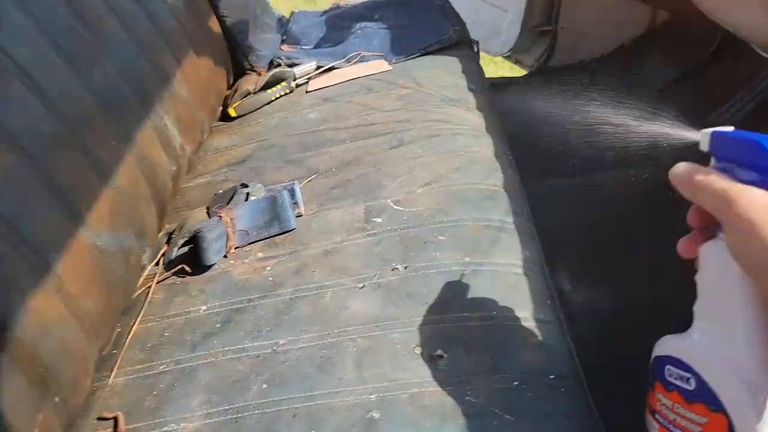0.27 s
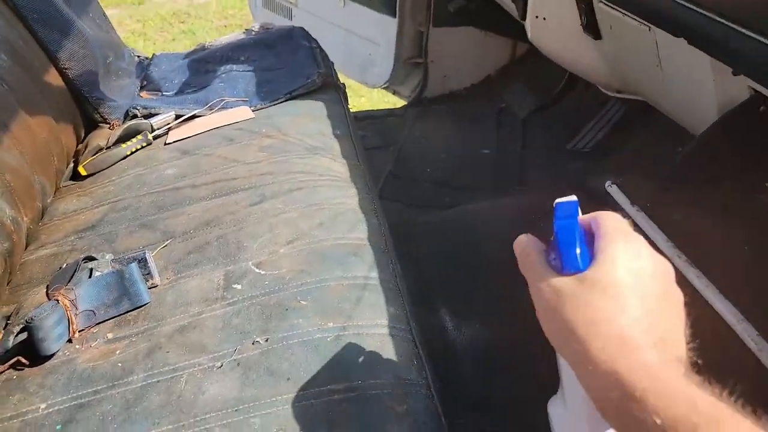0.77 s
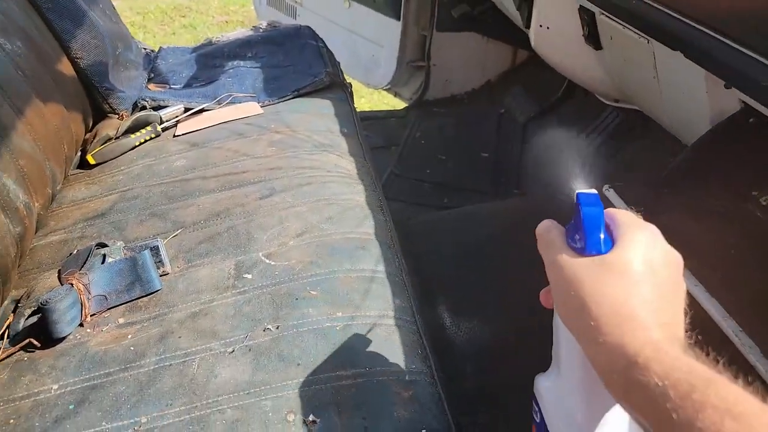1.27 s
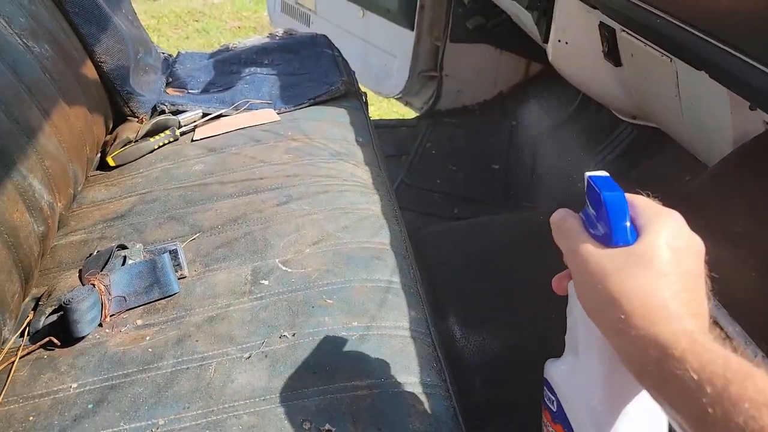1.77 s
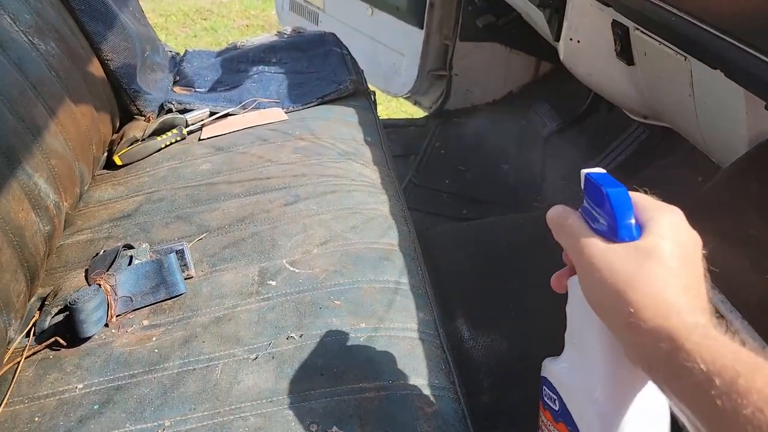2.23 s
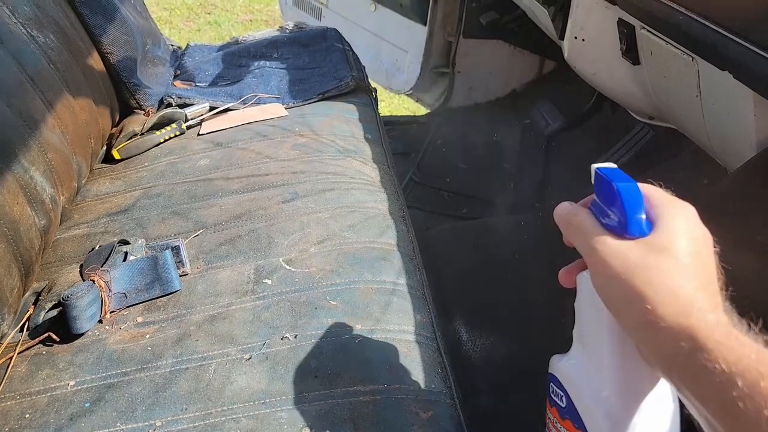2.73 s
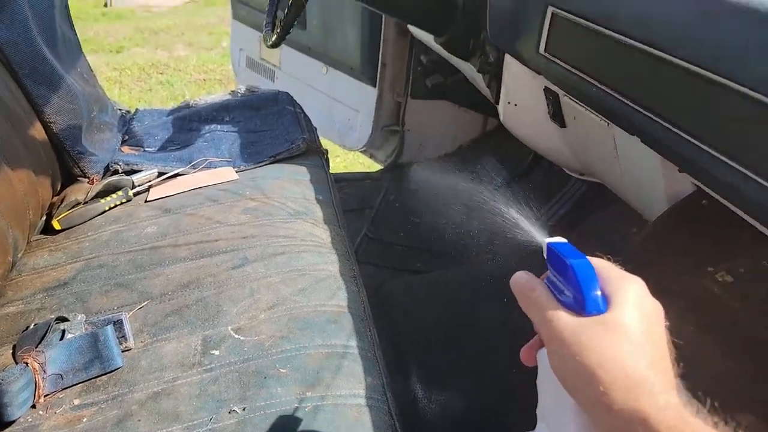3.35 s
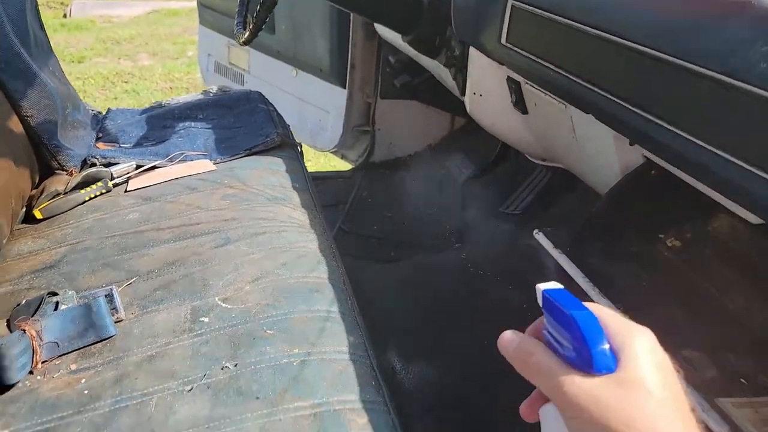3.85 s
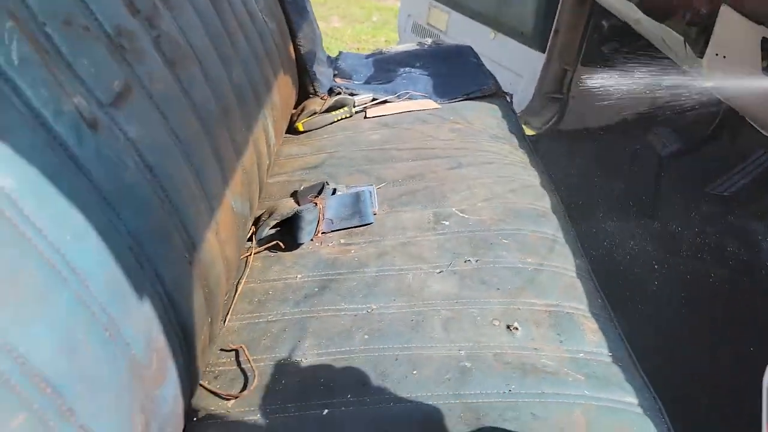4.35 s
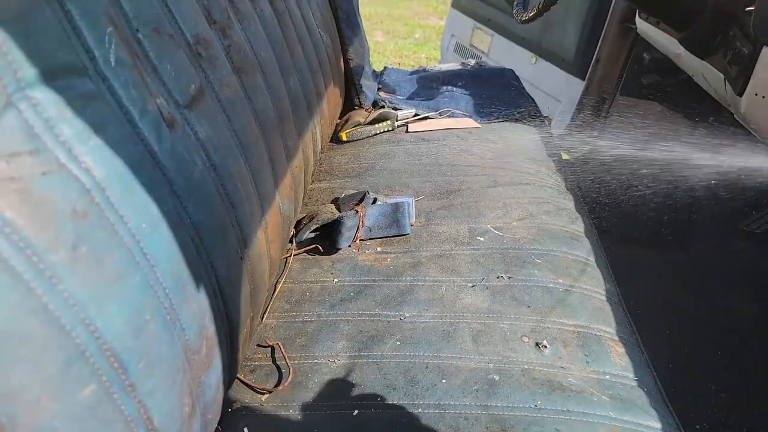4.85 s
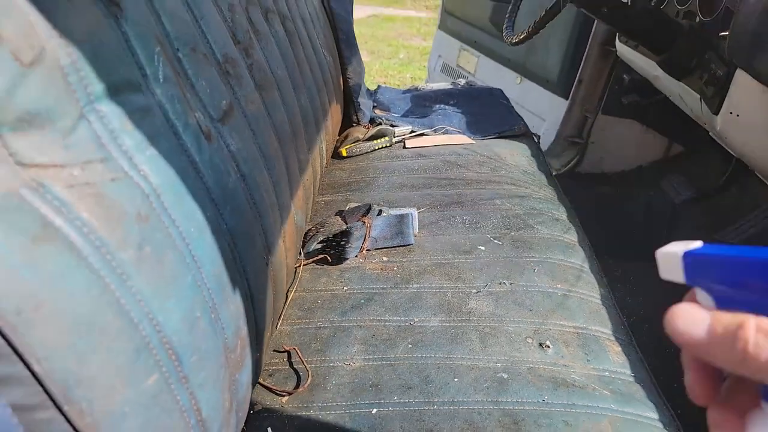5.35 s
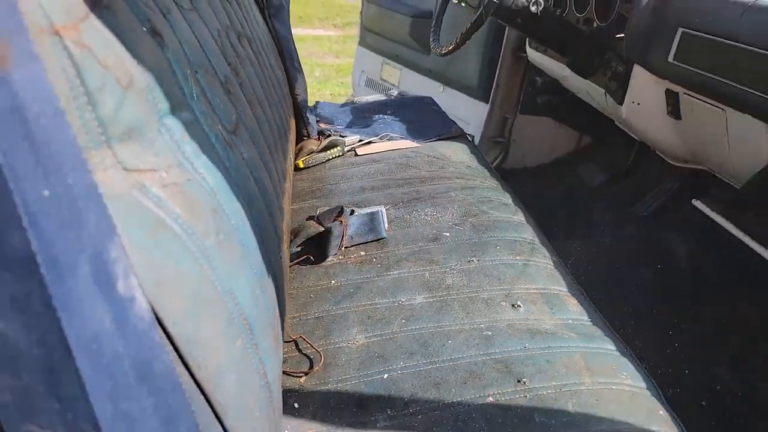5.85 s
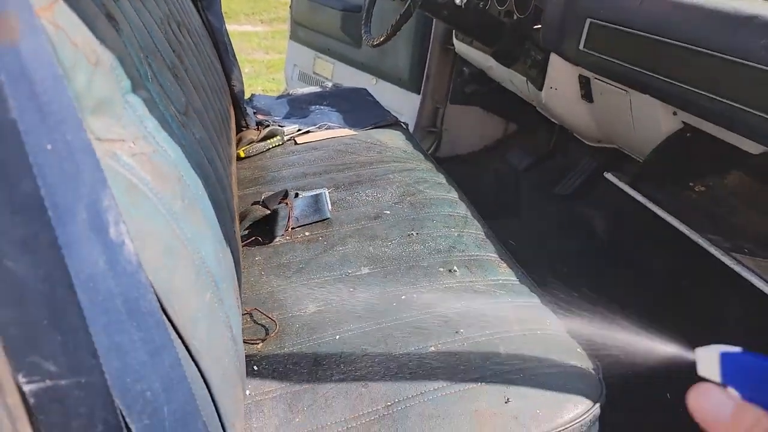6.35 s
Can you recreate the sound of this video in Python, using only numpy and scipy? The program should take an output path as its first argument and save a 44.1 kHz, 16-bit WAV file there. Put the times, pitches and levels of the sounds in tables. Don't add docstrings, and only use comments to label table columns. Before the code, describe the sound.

Close up in an open truck cab, a hand pumps a plastic spray bottle nearly three times a second. Each stroke gives a bright spring snap, hollow knocks and a short airy burst of mist. Slow returns breathe and faintly creak; thin high squeaks appear near the end. A low uneven engine hum and soft outdoor wash continue underneath, picked up by a handheld phone in stereo.

```python
import sys
import numpy as np
from scipy import signal
from scipy.fft import rfft, irfft, next_fast_len
from scipy.io import wavfile
from scipy.ndimage import uniform_filter1d

SR = 44100
rng = np.random.default_rng(int(sys.argv[2]) if len(sys.argv) > 2 else 0)


def store_wav(level_fs):
    pcm = np.round(np.clip(np.atleast_2d(level_fs), -1, 1) * 32767)
    wavfile.write(sys.argv[1], SR, pcm.T.astype(np.int16))


def field_ratio(decibels):
    return 10 ** (np.asarray(decibels, dtype=float) / 20)


N = 290619
T = np.arange(N) / SR
LONG = next_fast_len(N)
HZ = np.fft.rfftfreq(LONG, 1 / SR)

# top t/s, squeeze/s, let-off/s, level/dB
STROKES = [(0.036, 0.08, 0.064, -50), (0.355, 0.085, 0.064, -50.5), (0.686, 0.083, 0.058, -49.5),
           (1.019, 0.062, 0.064, -52.3), (1.368, 0.089, 0.077, -51.5), (1.759, 0.085, 0.077, -48),
           (2.159, 0.071, 0.1, -50), (2.644, 0.15, 0.043, -46.5), (3.055, 0.089, 0.052, -46),
           (3.404, 0.072, 0.094, -49), (3.801, 0.09, 0.07, -49.5), (4.185, 0.047, 0.062, -50.5),
           (4.555, 0.17, 0.15, -49), (4.94, 0.068, 0.063, -49.5), (5.305, 0.033, 0.11, -49.5),
           (5.691, 0.058, 0.093, -49), (6.104, 0.064, 0.093, -48.5), (6.489, 0.13, 0.078, -47)]
# start t/s, end t/s, first level/dB, last level/dB
LEAKS = [(.1, .28, -59, -68), (0.416, 0.555, -56.5, -66), (1.88, 1.99, -69, -69), (2.045, 2.1, -54, -63),
         (2.27, 2.52, -65, -54), (2.701, 2.88, -56.5, -70.5), (2.91, 2.967, -73, -68),
         (3.482, 3.662, -62, -67), (3.87, 4.04, -62, -65), (4.104, 4.407, -58.5, -56.5),
         (4.68, 4.807, -57.5, -63), (5.02, 5.102, -75, -77), (5.12, 5.265, -73, -59),
         (1.08, 1.19, -72, -74), (1.472, 1.57, -82, -83), (3.144, 3.24, -72, -64), (5.427, 5.545, -72, -64),
         (5.566, 5.573, -56, -56), (5.78, 5.872, -63, -75), (6.176, 6.363, -59.5, -58)]
# f/Hz, level/dB
MIST_SPECTRUM = [(250, -53), (500, -18.5), (800, -8), (1400, -2), (2200, -3), (3500, -4), (5000, -7),
                 (7000, -6.5), (8200, -9.5), (11000, -10), (13500, -6.5), (15000, -7)]

# t/s, peak level/dB
TRIGGER = [(.1722, -34.5), (.4397, -39), (.4716, -38), (.7865, -35), (.7995, -52), (.8612, -32),
           (1.1108, -35), (1.1468, -28.5), (1.275, -37), (1.301, -37), (1.6856, -40), (1.836, -33.5),
           (2.3479, -34), (2.465, -33), (2.5316, -33), (2.7778, -34.5), (2.861, -30), (3.1877, -38),
           (3.2115, -29), (3.3325, -34), (3.5423, -32), (3.5645, -32), (3.7092, -31), (4.2063, -28),
           (4.3312, -35), (4.8242, -33.5), (5.459, -30), (5.5733, -33.5), (5.8654, -35), (6.2445, -31)]
# t/s, peak level/dB
PISTON = [(.4867, -31.5), (.517, -34), (.5991, -29.5), (.7628, -39), (.9484, -33.5), (1.2026, -34.5),
          (1.585, -37), (1.9417, -33.5), (1.9972, -40), (2.0547, -35), (2.232, -35), (2.2515, -27.5),
          (2.4203, -36.5), (2.5032, -36), (2.7412, -38), (2.8908, -31.5), (2.9125, -36), (3.255, -34.5),
          (3.6182, -35), (3.6341, -35), (3.9953, -34), (4.0242, -33), (4.0701, -33), (4.658, -43),
          (5.5373, -44), (5.678, -39),
          (0.907, -39), (1.9053, -41.5), (2.005, -48), (2.962, -40), (4.305, -38.5), (4.6833, -37),
           (5.517, -36), (3.6054, -41), (3.686, -43), (.8445, -46), (6.4018, -37.5)]
# f/Hz, width/Hz, level/dB
SHELL_MODES = [(827, 30, -7), (1190, 320, -2.5), (1370, 18, -7), (1890, 290, -6.5), (2750, 220, -58),
               (3970, 84, -4)]
# t/s, peak level/dB
VALVE = [(.1487, -36.5), (1.263, -35.5), (5.8655, -37.5), (.2676, -32.5), (.5821, -43), (1.44, -36.5),
         (1.5, -45), (5.045, -44), (5.4156, -37), (.8606, -32), (1.2035, -31), (1.5844, -35.5),
         (2.8616, -32), (3.1657, -40), (3.253, -28.5), (3.3056, -31.5), (3.6611, -39), (3.914, -32.5),
         (4.2537, -33), (4.294, -35.5), (4.6247, -37), (4.6585, -31), (4.8488, -34), (4.9088, -31.5),
         (5.0145, -33), (5.192, -34.5), (5.9, -32), (5.916, -43), (5.923, -44), (5.957, -44), (5.99, -40),
         (6.326, -36), (6.2197, -33), (6.3734, -26.5)]
# t/s, peak level/dB
LATCH = [
    (1.6556, -30),
    (2.93, -38),
    (3.5937, -36.5),
    (5.1183, -40),
]
# t/s, peak level/dB, rattle t60/s, ring f/Hz
SPRING = [(.2783, -25.5, 0.14, 3430), (0.5923, -23, 0.13, 3710), (0.9207, -27, 0.093, 3540),
          (1.943, -38, 0.056, 2040), (2.0467, -28.5, 0.088, 2470), (2.499, -29.5, 0.17, 2380),
          (2.913, -31.5, 0.27, 3450), (3.3274, -25.5, 0.13, 3590), (3.7007, -25.5, 0.11, 3030),
          (4.0886, -25.5, 0.094, 3540), (4.4499, -26, 0.083, 2340), (4.8151, -23.5, 0.062, 3180),
          (5.222, -29.5, .12, 3380), (5.4588, -34, 0.084, 3380), (5.5637, -29.5, 0.07, 3480),
          (5.5866, -25, 0.097, 3430), (6.0018, -27.5, 0.076, 2890)]
# f/Hz, level/dB
CRACK_SPECTRUM = [(150, -11), (400, 0), (750, -2), (1250, 8), (2300, 3.5), (3450, 5), (4800, -6.5),
                  (5800, 3), (9000, -11.5), (15000, -8.5)]
# t/s, peak level/dB, f/Hz
PINGS = [(0.267, -31.5, 2280), (0.5815, -32, 2400), (.601, -33.5, 940), (.823, -44, 2900),
         (1.265, -39, 3300), (1.837, -35, 1950), (3.316, -28, 2310), (3.9135, -39, 1230),
         (3.933, -35, 1170), (4.625, -40, 3100), (4.909, -38, 2900), (5.046, -40, 2000), (5.097, -40, 1970),
         (5.135, -40, 1000), (5.168, -39, 480), (5.209, -35, 2300), (5.416, -39, 2000), (5.519, -40, 500),
         (5.865, -31.5, 2090), (5.915, -38.5, 502), (6.38, -36, 2150)]
# t/s, clunk level/dB, thump level/dB
CLUNKS = [(.29, -35, -44), (.518, -38, -50), (.6, -39.5, -42), (.932, -34, -48), (1.66, -54, -48.5),
          (2.258, -39, -53), (2.49, -41, -42.5), (3.258, -37, -51), (3.336, -32, -46), (3.711, -32, -40),
          (4.07, -40, -50), (4.456, -36, -39.5), (4.82, -37, -40.5), (5.235, -43, -39.5), (5.595, -36, -39),
          (6.01, -38, -42)]
# start t/s, end t/s, slip rate/Hz, first level/dB, last level/dB
ZIPS = [
    (4.73, 4.785, 100, -39, -29),
    (6.305, 6.328, 220, -31, -34),
]

# start t/s, end t/s, level/dB, first f/Hz, last f/Hz
DRAGS = [
    (1.955, 2.035, -50, 1300, 1330),
    (3.6, 3.67, -48, 1340, 1320),
    (4.02, 4.09, -46, 1430, 1360),
    (1.59, 1.635, -51, 1330, 1270),
]
# start t/s, end t/s, level/dB, ring f/Hz
CREAKS = [(0.446, 0.556, -61, 1290), (0.78, 0.832, -53, 1260), (0.92, 0.977, -54, 1350),
          (1.113, 1.176, -52, 1190), (1.27, 1.327, -50, 1190), (1.584, 1.632, -51, 1320),
          (1.65, 1.701, -52, 1220), (1.956, 2.032, -52, 1310), (2.346, 2.56, -62, 1300),
          (2.726, 2.798, -53.5, 1150), (2.92, 2.982, -51, 1230), (3.175, 3.303, -53, 1250),
          (3.6, 3.657, -52, 1320), (3.995, 4.06, -50, 1370), (4.19, 4.234, -55, 1210),
          (4.294, 4.39, -57, 1240), (4.727, 4.777, -50.5, 1420), (5.066, 5.105, -54, 1130),
          (5.511, 5.546, -51.5, 1330), (6.304, 6.328, -54, 1490)]
# start t/s, end t/s, neck level/dB, neck f/Hz, belly level/dB
SLOW_PULLS = [
    (1.27, 1.42, -51, 2150, -74),
    (2.3, 2.725, -48.5, 2420, -54),
    (3.36, 3.47, -51, 2250, -68),
    (4.263, 4.712, -47.5, 2240, -53),
    (5.054, 5.208, -54, 2120, -55.5),
    (5.48, 5.824, -54, 2320, -53.5),
    (6.05, 6.152, -48, 2400, -70),
    (6.1, 6.592, -56, 2190, -49),
]
# t/s, f/Hz
SQUEAKS = [
    [(5.095, 10500), (5.125, 12100), (5.165, 13700), (5.185, 12800), (5.197, 11900), (5.205, 12800),
     (5.232, 12900)],
    [(5.135, 12700), (5.19, 13300), (5.24, 14000), (5.28, 14550), (5.32, 14400)],
    [(5.34, 14500), (5.378, 14950), (5.42, 13700), (5.445, 13750), (5.5, 14850), (5.515, 14100),
     (5.53, 13100), (5.555, 12000)],
    [(5.46, 14000), (5.535, 14600)],
    [(5.558, 13800), (5.567, 14100), (5.585, 13500)],
    [(5.588, 14300), (5.602, 14400)],
    [(5.615, 12800), (5.635, 12650)],
    [(5.29, 12500), (5.35, 12600)],
    [(5.662, 11900), (5.695, 12300)],
]
SQUEAK_GAINS_DB = [-1, -4, 1, -3, 1, 0, 1, 0, 1]

# t/s, rotation f/Hz
SHAFT = [(0.0, 13.332), (0.94, 13.333), (1.89, 13.299), (2.83, 13.281), (3.77, 13.234), (4.71, 13.266),
         (5.66, 13.359), (6.6, 13.397)]
# multiple of shaft speed, first level/dB, last level/dB
ENGINE_ORDERS = [(4, -39, -45), (5, -36.5, -40.5), (6, -45.5, -53), (7, -41, -45), (8, -50, -53),
                 (9, -55, -55), (10, -56, -62), (14, -65, -59), (15, -55, -71)]
# t/s, level/dB
KICKS = [(-.0144, -29.6), (.3944, -29.7), (.7111, -32.7), (.98, -25.5), (1.0333, -31.3), (1.1167, -28),
         (1.2322, -26.6), (1.4644, -26.3), (1.5767, -33.4), (1.7656, -25.6), (2.1067, -30.1),
         (2.2578, -31.9), (2.4022, -34.3), (2.5356, -31.1), (2.6333, -34.3), (2.9344, -29.8), (3.1167, -28),
         (3.24, -31.6), (3.4, -30.6), (3.5078, -31.4), (3.8667, -30.4), (4.1333, -28.7), (4.31, -31.1),
         (4.5411, -34.5), (5.1278, -31.8), (5.6311, -28.6), (5.7322, -28.5), (5.8311, -32.6), (5.9322, -28),
         (6.0811, -29.6)]
# t/s, level/dB, f/Hz
THUDS = [
    (0.495, -33, 102),
    (4.398, -26.5, 89),
    (4.643, -23.5, 80),
    (6.08, -35, 104),
]
# f/Hz, level/dB
WASH_SPECTRUM = [(36, -24), (50, -0.5), (75, -5), (110, -16.5), (165, -26), (400, -33), (520, -32), (1100, -33),
                 (1800, -34.5), (2500, -34.5), (3700, -38.5), (4700, -36), (6200, -47.5), (7500, -53),
             (9300, -39), (10700, -56.5), (15000, -76)]
# t/s, level/dB
RUMBLE_SWELL = [(0.0, -52), (0.33, -51), (0.68, -56), (2.24, -54), (2.62, -52), (3.01, -57), (3.17, -58),
                (3.4, -53.5), (4.13, -53.5), (4.52, -50), (4.72, -50), (4.88, -53.5), (5.1, -51),
                (5.35, -50), (5.8, -50), (5.97, -53), (6.59, -49)]

# f/Hz, shared amplitude/1
PORT_LIKENESS = [(60, 1), (150, 0.53), (300, 0.61), (600, 0.48), (1400, 1), (3400, 0.24), (4500, 0.18),
                 (15000, 0.13)]
# f/Hz, phase/rad
PORT_LEAD = [(60, -0.5), (260, 0.9), (690, -2), (1900, -2), (2400, -1.5), (3400, -3), (15000, -1.5)]
# f/Hz, level/dB
PORT_TILT = [(60, 1.5), (130, -2.5), (290, -2), (640, -3.5), (1410, 1.5), (3100, 3.5), (6820, 0),
             (15000, -2.5)]

TRIGGER_HZ, PISTON_HZ, VALVE_HZ, LATCH_HZ = 1190, 1325, 2720, 5700
KNOCK_T60_S, VALVE_T60_S = 0.032, 0.081
CLUNK_HZ, THUMP_HZ, CLUNK_T60_S = 749, 223.7, 0.053
BOOM_HZ = 60


def evened(x):
    return x / np.sqrt(np.mean(x ** 2) + 1e-20)


def read(points, hz):
    f, value = np.transpose(points)
    return np.interp(np.log(hz + 1), np.log(f + 1), value)


def coloured(x, points):
    return irfft(rfft(x, LONG) * field_ratio(read(points, HZ)), LONG)[:, :N]


def band_rms(x, lo_hz, hi_hz):
    z = rfft(x.mean(0), LONG)[(HZ > lo_hz) & (HZ < hi_hz)]
    return np.sqrt(2 * np.sum(abs(z) ** 2) / N / LONG)


def smooth_noise(length, count):
    return evened(uniform_filter1d(rng.standard_normal(length), size=count))


def drift(count):
    return evened(uniform_filter1d(smooth_noise(N, count), size=count))


def ring(x, hz, width):
    r = np.exp(-np.pi * width / SR)
    return signal.lfilter([1 - r, 0, r - 1], [1, -2 * r * np.cos(2 * np.pi * hz / SR), r * r], x)


def ports(pair):
    a, b = rfft(pair, LONG)
    same = np.clip(read(PORT_LIKENESS, HZ), 0, 1)
    half_tilt = field_ratio(read(PORT_TILT, HZ) / 2)
    shared = same * a * np.exp(-1j * read(PORT_LEAD, HZ))
    right = shared + np.sqrt(1 - same ** 2) * b
    return irfft(np.array([a * half_tilt, right / half_tilt]), LONG)[:, :N]


def mist():
    drop_db, shape = -10, 2.3
    level, leak = np.zeros(N), np.zeros(N)
    for top, squeeze, let_off, db in STROKES:
        away = np.where(T < top, (top - T) / squeeze, (T - top) / let_off)
        level += field_ratio(db + drop_db * np.minimum(away, 4) ** shape)
    for start, end, first_db, last_db in LEAKS:
        leak += field_ratio(np.interp(T, [start, end], [first_db, last_db], -99, -99))
    keep = np.exp(-1 / (0.033 * SR))
    drizzle = field_ratio(-43) * signal.lfilter([1 - keep], [1, -keep], level)
    level = np.hypot(level, uniform_filter1d(leak, size=250)) + drizzle

    droplet_size = field_ratio(5 * np.minimum(rng.exponential(1, (2, N)), 4))
    spit = droplet_size * (rng.random((2, N)) < 3000 / SR)
    spit = evened(spit * rng.choice([-1, 1], (2, N)))
    raw = rng.standard_normal((2, N)) + 0.28 * spit
    swirl = field_ratio(-12) * ring(raw, 2200, 190)
    noise = ports(coloured(raw + swirl, MIST_SPECTRUM))
    noise /= band_rms(noise, 11000, 15500)
    return level * field_ratio(1.0 * drift(count=200)) * noise


def strikes(events, voice, blow_db, tail_db):
    out = np.zeros((2, N + 6000))
    for s, db, hz, t60 in events:
        t = np.arange(6000 if t60 > 0.075 else 2500) / SR
        decay = field_ratio(tail_db - 60 * t / max(t60, .01))
        drive = rng.standard_normal((2, len(t))) * decay * np.minimum(t / 0.00012, 1)
        clumps = smooth_noise(len(t), 90)
        drive *= field_ratio(3.7 * np.minimum(t / 0.0086, 1) * clumps)
        drive[:, 8] += field_ratio(blow_db)
        hit = voice(drive, hz)
        at = round(s * SR)
        out[:, at:at + len(t)] += field_ratio(db) * hit / abs(hit).max()
    return out[:, :N]


def parts(rows, hz, t60):
    spread = 1 + 0.016 * rng.uniform(-1.5, 1, len(rows))
    return [(s, db, hz * k, t60) for (s, db), k in zip(rows, spread)]


def hollow(blow, hz):
    rings = ring(blow, hz, 97)
    for f, width, db in SHELL_MODES:
        rings = rings + field_ratio(db) * ring(blow, f, width) * np.sqrt(150 / width)
    return ring(rings, hz, 750)


def bright(blow, hz):
    f = np.fft.rfftfreq(8192, 1 / SR)
    gain = np.log(field_ratio(read(CRACK_SPECTRUM, f)))
    both_sides = np.r_[gain, gain[-2:0:-1]]
    causal = np.exp(np.conj(signal.hilbert(both_sides)))[:len(f)]
    crack = irfft(rfft(blow, 8192) * causal)[:, :blow.shape[1]]
    return crack + field_ratio(7.0) * ring(blow, hz, 200)


def pure(blow, hz):
    return ring(ring(blow, hz, 0.11 * hz), hz, 0.59 * hz)


def wide(blow, hz):
    return ring(ring(blow, hz, 900), hz, 1800)


def knocks():
    low = parts(TRIGGER, TRIGGER_HZ, KNOCK_T60_S)
    low += parts(PISTON, PISTON_HZ, KNOCK_T60_S)
    low = [(s + .0015, *rest) for s, *rest in low]
    return field_ratio(5.5) * strikes(low, hollow, blow_db=16, tail_db=-8)


def snaps():
    high = parts(VALVE, VALVE_HZ, VALVE_T60_S) + parts(LATCH, LATCH_HZ, VALVE_T60_S)
    high += [(s, db, hz, t60) for s, db, t60, hz in SPRING]
    return field_ratio(4.0) * strikes(high, bright, blow_db=14.5, tail_db=3.5)


def small_parts():
    rings = [(s, db, hz, .03) for s, db, hz in PINGS]
    rings += [(s, db, CLUNK_HZ, CLUNK_T60_S) for s, db, _ in CLUNKS]
    rings += [(s, db, THUMP_HZ, CLUNK_T60_S) for s, _, db in CLUNKS]
    slips = []
    for start, end, rate, first_db, last_db in ZIPS:
        for s in np.arange(start, end, 1 / rate):
            slips.append((s, np.interp(s, [start, end], [first_db, last_db]), 1600, .012))
    ringing = strikes(rings, pure, blow_db=7.5, tail_db=-1.5)
    return field_ratio(1.5) * (ringing + strikes(slips, wide, blow_db=20, tail_db=-10))


def drags():
    width_hz = 60
    out = np.zeros((2, N))
    for start, end, db, first_hz, last_hz in DRAGS:
        part = (T > start) & (T < end)
        size = part.sum()
        fuzz = rng.standard_normal((2, 2, size))
        fuzz = evened(uniform_filter1d(fuzz, size=SR // (2 * width_hz)))
        angle = 2 * np.pi * np.cumsum(np.linspace(first_hz, last_hz, size)) / SR
        tone = evened((1 + fuzz[0]) * np.cos(angle) + fuzz[1] * np.sin(angle))
        out[:, part] += field_ratio(db) * signal.windows.tukey(size, .4) * tone
    return out


def creaks():
    out = np.zeros((2, N + 3000))
    for start, end, db, hz in CREAKS:
        size = round((end - start) * SR)
        happens, strength, grit = rng.random((3, size))
        slips = (happens < 400 / SR) * field_ratio(9 * strength) + .08 * (grit - .5)
        scrape = signal.lfilter([1], [1, -.85], slips) * rng.standard_normal((2, size))
        scrape *= signal.windows.tukey(size, .3)
        sound = hollow(np.pad(scrape, ((0, 0), (0, 3000))), hz)
        sound = field_ratio(db + 2.0) * (evened(sound) + 0.15 * evened(ring(sound, hz, 65)))
        at = round(start * SR)
        out[:, at:at + size + 3000] += sound
    return out[:, :N]


def bottle():
    neck_width_hz, belly_hz, belly_width_hz = 260, 510, 150
    air = rng.standard_normal((2, 2, N))
    out = np.zeros((2, N))
    for start, end, neck_db, neck_hz, belly_db in SLOW_PULLS:
        part = (T > start) & (T < end)
        neck = evened(ring(ring(air[0][:, part], neck_hz, neck_width_hz), neck_hz, neck_width_hz))
        belly = evened(ring(ring(air[1][:, part], belly_hz, belly_width_hz), belly_hz, belly_width_hz))
        out[:, part] += np.sqrt(np.hanning(part.sum())) * (field_ratio(neck_db) * neck + field_ratio(belly_db) * belly)
    return out


def squeak():
    waver = 1 + .007 * drift(count=40)
    level = field_ratio(-56.5 + 2.2 * drift(count=250))
    out = np.zeros(N, complex)
    for rows, gain_db in zip(SQUEAKS, SQUEAK_GAINS_DB):
        part = (T > rows[0][0]) & (T < rows[-1][0])
        hz = np.interp(T[part], *np.transpose(rows)) * waver[part]
        angle = 2 * np.pi * np.cumsum(hz) / SR
        out[part] += field_ratio(gain_db) * signal.windows.tukey(part.sum(), .3) * np.exp(1j * angle)
    return np.sqrt(2) * level * np.array([out.real, 0.61 * out.imag])


def boom():
    level_db, phase_rad, swell_s = -35.7, 2.1, .035
    out = field_ratio(level_db) * np.cos(phase_rad + 2 * np.pi * BOOM_HZ * T)
    for s, db in KICKS:
        part = slice(max(round(s * SR), 0), round(s * SR) + SR // 2)
        u = (T[part] - s) / swell_s
        swell = (u / 2) ** 2 * np.exp(2 - u)
        out[part] += field_ratio(db) * swell * np.sin(2 * np.pi * BOOM_HZ * (T[part] - s))
    return out


def engine():
    crank_rad, lag_rad = -1.1, 2.75
    out = boom()
    angle = crank_rad + 2 * np.pi * np.cumsum(np.interp(T, *np.transpose(SHAFT))) / SR
    for order, first_db, last_db in ENGINE_ORDERS:
        level_db = np.linspace(first_db, last_db, N) + .6 * drift(count=12000)
        out += field_ratio(level_db) * np.cos(order * angle - lag_rad)
    for s, db, hz in THUDS:
        u = np.maximum(T - s, 0) / 0.0067
        out += field_ratio(db) * u * np.exp(1 - u) * np.sin(2 * np.pi * hz * (T - s))
    out *= np.sqrt(2)
    panels = ring(ring(rng.standard_normal(N), BOOM_HZ, 39), BOOM_HZ, 39)
    panels = field_ratio(-50.5) * evened(panels)
    return np.array([np.roll(out, 6) + panels, out - panels])


def highpass(x, hz):
    return signal.sosfiltfilt(signal.butter(2, hz, "highpass", fs=SR, output="sos"), x)


def wash():
    noise = ports(coloured(rng.standard_normal((2, N)), WASH_SPECTRUM))
    noise /= band_rms(noise, 400, 3500)
    upper, hiss = highpass(noise, 135), highpass(noise, 750)
    swell_db = np.interp(T, *np.transpose(RUMBLE_SWELL))
    rumble_db = swell_db + 1.0 + 1.2 * drift(count=3000)
    hiss_db = -54.5 + 0.049 * (swell_db - swell_db.mean()) + 1.0 * drift(count=2500)
    return field_ratio(-55.0) * (noise - upper) + field_ratio(rumble_db) * (upper - hiss) + field_ratio(hiss_db) * hiss


def patchy(x, depth_db):
    z = signal.stft(x, nperseg=512)[2]
    field = rng.standard_normal(z.shape[1:][::-1]).T
    field = uniform_filter1d(uniform_filter1d(field, size=4, axis=0), size=16, axis=1)
    return signal.istft(z * field_ratio(depth_db * evened(field)), nperseg=512)[1][:, :N]


def scene():
    pump = knocks() + snaps() + small_parts() + drags() + creaks() + bottle()
    air = patchy(mist() + wash(), depth_db=1.7)
    return ports(pump) + air + squeak() + engine()


def band_limit(x):
    return signal.sosfilt(signal.butter(12, 16870, fs=SR, output="sos"), x)


def record(dry):
    limited = irfft(rfft(dry, LONG) * (HZ < 15760), LONG)[:, :N]
    return band_limit(limited)


dry = scene()
out = record(dry)
store_wav(out)
```